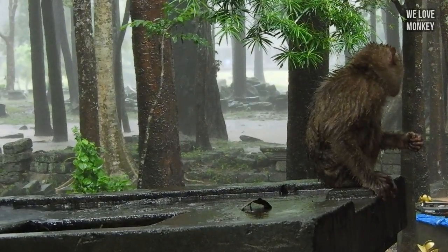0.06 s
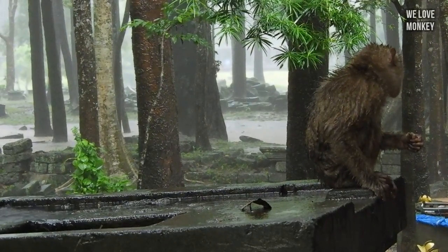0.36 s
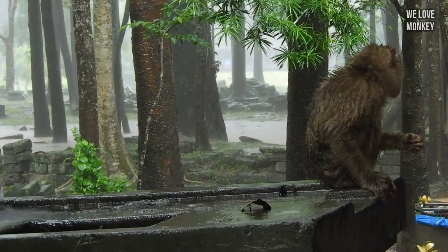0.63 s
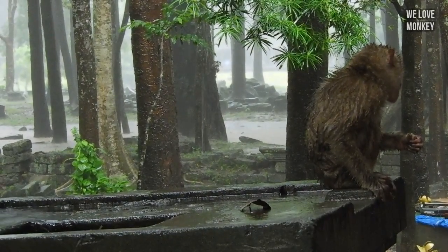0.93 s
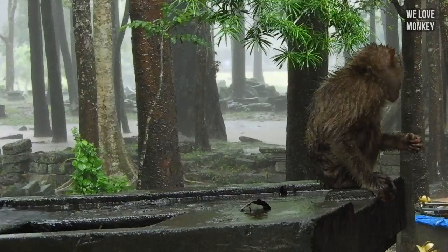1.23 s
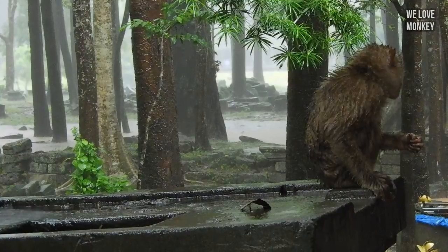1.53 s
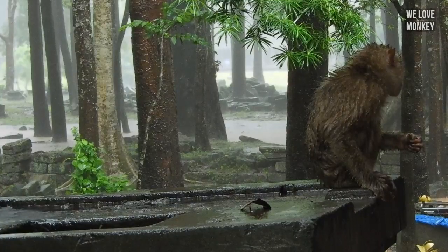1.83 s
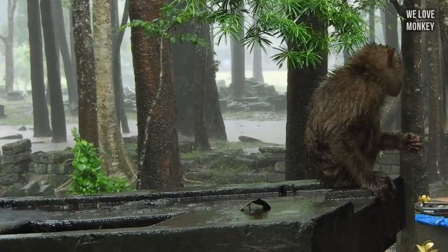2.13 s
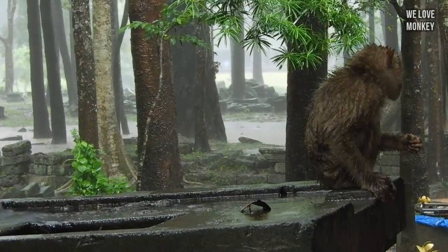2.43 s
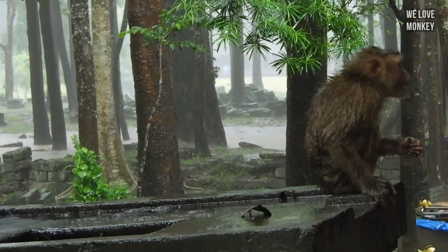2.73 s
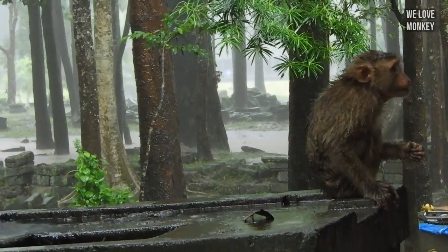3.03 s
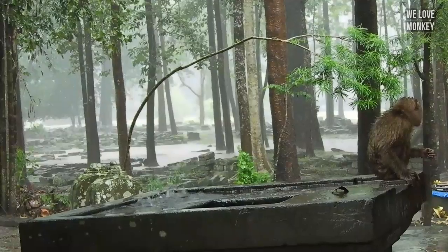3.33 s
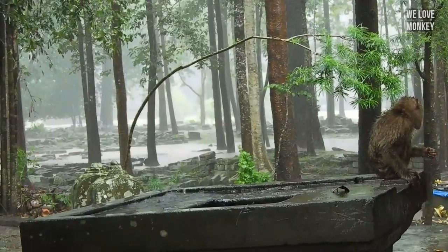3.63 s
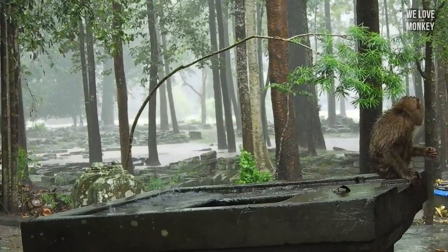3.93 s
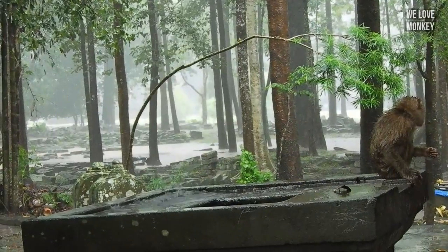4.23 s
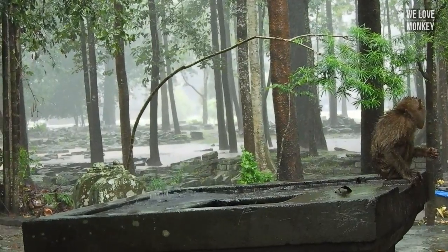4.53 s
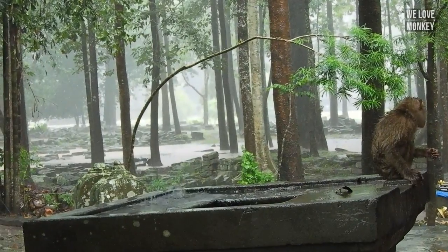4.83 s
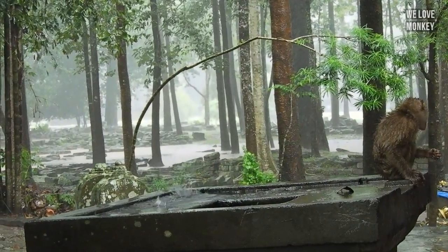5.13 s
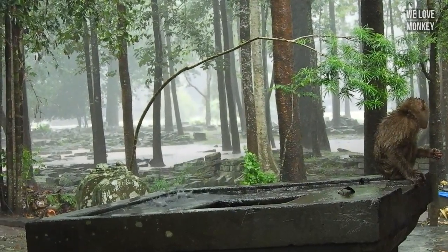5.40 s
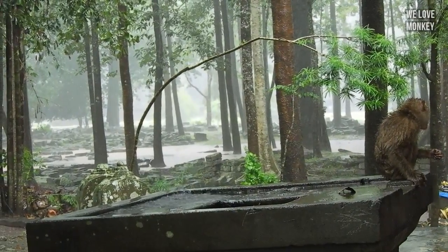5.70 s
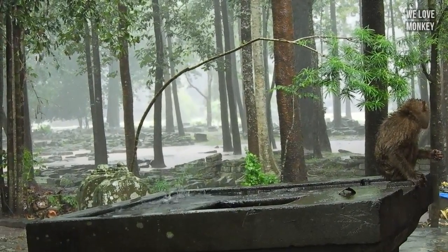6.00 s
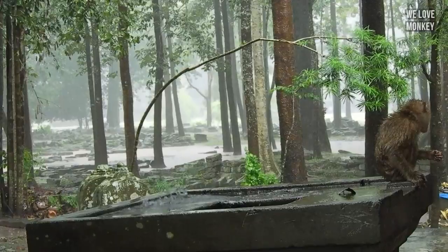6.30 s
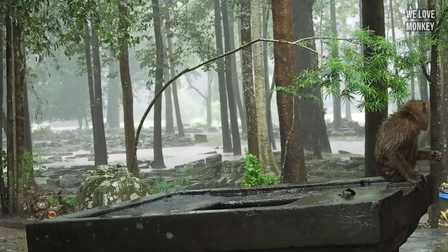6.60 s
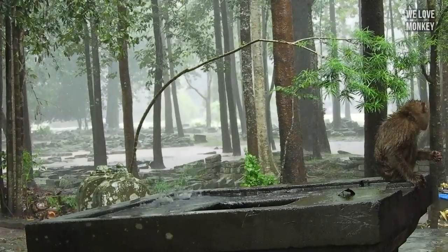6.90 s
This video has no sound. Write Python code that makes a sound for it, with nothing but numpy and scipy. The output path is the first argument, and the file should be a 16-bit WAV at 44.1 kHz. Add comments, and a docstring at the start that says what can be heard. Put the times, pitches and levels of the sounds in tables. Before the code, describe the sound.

Heavy rain falls steadily in a forest, a wide hiss from the canopy with small drops pattering on leaves and plinking in puddles. Close to the microphone, fat drops slap irregularly on wet stone, each with a short echo off the trees. A little before halfway the sound cuts out for half a second, then returns unchanged. A faint hum and a slowly growing distant rumble lie underneath.

```python
"""Heavy, steady rain on a forest: fat drops slap on wet stone close by and echo off the trees.
Behind them small drops patter on leaves, bubbles ring in puddles and the canopy blurs into a wide wash.
Underneath lie a faint hum and a low rumble that slowly grows and surges a few times.
The sharpest drops trip the gain control, which creeps back up; the sound cuts out for half a second."""
import sys
import numpy as np
from scipy import signal
from scipy.fft import rfft, irfft
from scipy.io import wavfile
from scipy.ndimage import uniform_filter1d, minimum_filter1d

SR = 44100
rng = np.random.default_rng(int(sys.argv[2]) if len(sys.argv) > 2 else 0)


def persist_wave(psi):
    """Save psi, clipped to +-1, as 16-bit WAV."""
    counts = np.round(np.clip(psi, -1, 1) * 32767).astype(np.int16)
    wavfile.write(sys.argv[1], SR, np.atleast_2d(counts).T)


N = 315315
TIME = np.arange(N) / SR

# treble response of the microphones: f/Hz, gain/dB
MIC_TREBLE = [(4000, 2), (7500, 0.5), (8900, 5), (9400, 5.5), (10000, 0), (11500, -8), (12500, -12.5),
              (13100, -17), (14500, -16), (16000, -38.5)]


def gain_of(db):
    """Decibels as an amplitude factor."""
    return 10 ** (np.asarray(db) / 20)


def unit_rms(x):
    """Scales to rms 1."""
    return x / np.sqrt(np.mean(x ** 2) + 1e-20)


def curve_at(points, hz):
    """Reads a spectrum table on a log-frequency axis."""
    f, value = np.transpose(points)
    return np.interp(np.log(hz + 1), np.log(f + 1), value)


def fader(points):
    """A gain ride through points of t/s, level/dB."""
    return gain_of(np.interp(TIME, *np.transpose(points)))


def add(mix, start_s, sound):
    """Mixes a stereo sound in at start_s."""
    part = mix[:, max(round(start_s * SR), 0):][:, :sound.shape[1]]
    part += sound[:, :part.shape[1]]


def bell_db(hz, centre_hz, octaves):
    """An EQ bell, 3 dB down at the given distance from its centre."""
    return np.maximum(-3 * (np.log2((hz + 1) / centre_hz) / octaves) ** 2, -80)


def grid(size):
    """Frame times (a column) and bin frequencies for short-time spectra."""
    hop = size // 4
    return np.arange(N // hop + 6)[:, None] * hop / SR, np.fft.rfftfreq(size, 1 / SR)


def shaped_noise(field_db, coherence):
    """Stereo noise of rms 1 that follows a frames x bins level field; coherence 1 is mono."""
    a, b, c, d = rng.standard_normal((4,) + field_db.shape)
    size = 2 * (field_db.shape[1] - 1)
    left = a + 1j * b
    right = coherence * left + np.sqrt(1 - coherence ** 2) * (c + 1j * d)
    spectra = (np.array([left, right]) * gain_of(field_db)).swapaxes(1, 2)
    return unit_rms(signal.istft(spectra, nperseg=size, noverlap=size * 3 // 4)[1][:, :N])


def running_rms(x):
    """Level of both channels over a millisecond and a half."""
    power = uniform_filter1d(np.mean(x ** 2, axis=0), size=66, mode="constant")
    return np.sqrt(abs(power) + 1e-12)


def stereo_tilt_and_comb(x, comb_db=3, comb_hz=3900, tooth_spacing_hz=100.7):
    """The left side is a little brighter; a fine comb filter colours the hiss near 4 kHz."""
    # stereo tilt: f/Hz, left minus right/dB
    imbalance = [(100, -.5), (800, 0.5), (1400, -1), (2400, 1.6), (4000, 0), (7000, 1), (9000, 2),
                 (13000, 2)]
    hz = np.fft.rfftfreq(N, 1 / SR)
    depth_db = comb_db * gain_of(bell_db(hz, comb_hz, octaves=0.12))
    teeth_db = depth_db * (np.cos(2 * np.pi * hz / tooth_spacing_hz) - .5)
    sides_db = np.array([[.5], [-.5]]) * curve_at(imbalance, hz)
    return irfft(rfft(x) * gain_of(teeth_db + sides_db), N)


def hum(centre_hz=56, width_hz=7, level_db=-60):
    """A faint low hum: a band of noise so narrow that it wavers."""
    t, hz = grid(size=8192)
    line_db = -20 * np.log10(1 + ((hz - centre_hz) / width_hz) ** 2)
    return gain_of(level_db) * shaped_noise(np.tile(line_db, (len(t), 1)), coherence=0.9)


def rumble(bed_hz=174, surge_sigma_s=0.083, trim_db=-1.5):
    """A dull far-off rumble that slowly grows, with a few surges, each at its own pitch."""
    # ride of the rumble bed: t/s, level/dB before trim
    bed_levels = [(0, -45), (.8, -51.5), (1.4, -48.5), (2.1, -49), (3.3, -44), (4.4, -47), (6.1, -43),
                  (7.15, -43.5)]
    # crests of the surges: t/s, level/dB before trim, f/Hz
    surges = [(4.71, -41.5, 135), (4.97, -39, 243), (5.22, -44, 143), (6.72, -43.5, 220),
              (6.93, -41.5, 148)]
    t, hz = grid(size=2048)

    def roar(centre_hz):
        """Low noise around one pitch; distance cuts the upper side steeply."""
        band_db = bell_db(hz, centre_hz, octaves=np.where(hz < centre_hz, 1.0, 0.5))
        return shaped_noise(np.tile(band_db, (len(t), 1)), coherence=0.98)

    out = fader(bed_levels) * roar(bed_hz)
    for crest_s, level_db, centre_hz in surges:
        swell = np.exp(-.5 * ((TIME - crest_s) / surge_sigma_s) ** 2)
        out += gain_of(level_db) * swell * roar(centre_hz)
    return gain_of(trim_db) * out


def canopy_wash(level_db=-33.5, patchy_db=2.0, flicker_db=0.75):
    """Countless far drops merge into a hiss with small drifting patches."""
    # tone of the far rain: f/Hz, relative level/dB
    tone = [(15, -21.5), (45, -1), (130, 2.5), (300, 3.5), (520, 0.5), (820, 3.5), (1300, 1), (2000, -0.5),
            (2800, 0.44), (4000, -2), (6000, 0), (8000, 3.5), (16000, -12.5)]
    # its stereo image: f/Hz, left-right coherence
    image = [(100, 0.98), (500, 0.81), (820, 0.92), (1500, 0.67), (2800, 0.69), (5000, 0.75), (6500, 0.31),
             (8000, -0.16), (14000, 0.077)]
    t, hz = grid(size=512)
    patches = uniform_filter1d(rng.standard_normal((len(t), len(hz))), size=12, axis=0)
    patches = unit_rms(uniform_filter1d(patches, size=5, axis=1))
    flicker = unit_rms(uniform_filter1d(rng.standard_normal(len(t)), size=12))[:, None]
    nearness = hz / (hz + 250)  # the lows come from farther off and are smoother
    texture_db = nearness * (patchy_db * patches + flicker_db * flicker)
    field_db = curve_at(tone, hz) + curve_at(MIC_TREBLE, hz) + texture_db
    return gain_of(level_db) * shaped_noise(field_db, curve_at(image, hz))


def bubbles(level_db=-43, spread_db=10, low_hz=550, high_hz=3600, ring_s=0.015, rise=0.042, count=150):
    """Drops in puddles trap bubbles, which ring briefly and rise a little in pitch."""
    out, t = np.zeros((2, N)), np.arange(SR // 12) / SR
    for when, pitch, softness, side in rng.random((count, 4)):
        hz = low_hz * (high_hz / low_hz) ** pitch
        ring = np.sin(2 * np.pi * hz * t * (1 + rise * t / t[-1])) * np.exp(-t / ring_s)
        sides = np.sqrt([[.5 + side], [1.5 - side]])
        add(out, when * N / SR, gain_of(level_db - spread_db * softness) * sides * ring)
    return out


def splash(centre_hz, slap_s=0.00022, grit=1.0, spray=0.16, spray_s=0.0011, octaves=0.46, crack_db=2):
    """One drop, peak 1: a slap a few cycles long, then spray that scatters to each side."""
    size = 512
    t, hz = np.arange(size) / SR, np.fft.rfftfreq(size, 1 / SR)
    slap = np.cos(2 * np.pi * (centre_hz * t + rng.random())) + grit * rng.standard_normal(size)
    slap = slap * np.sqrt(t / slap_s) * np.exp(1 - t / slap_s)
    scatter = 2 * spray * np.exp(-t / spray_s) * rng.standard_normal((2, size))
    # the drop's direction sets the lag between the microphones
    lag_s = 0.000498 + np.array([[-1], [1]]) * rng.normal(0, .000045)
    shelf_db = crack_db * np.clip((hz - 9500) / 3500, 0, 1)  # a hard surface adds top treble
    colour = gain_of(bell_db(hz, centre_hz, octaves) + shelf_db + curve_at(MIC_TREBLE, hz))
    drop = irfft(rfft(slap + scatter) * colour * np.exp(-2j * np.pi * hz * lag_s))
    return drop / abs(drop).max()


def patter(per_s, level_db, spread_db, low_hz, high_hz, largest, surfaces=48):
    """Drops of all sizes at random moments; each kind of leaf or puddle has its own pitch and side."""
    lands = rng.random(N) < per_s / SR
    bulk = np.minimum(rng.exponential(1, N), largest)
    hits = gain_of(spread_db * bulk) * lands
    surface = rng.integers(0, surfaces, N)
    out = np.zeros((2, N))
    for k, hz in enumerate(np.linspace(low_hz, high_hz, surfaces)):
        sides = gain_of(np.array([[1], [-1]]) * rng.normal(0, 4.5))
        out += sides * signal.oaconvolve((hits * (surface == k))[None], splash(hz), axes=1)[:, :N]
    return gain_of(level_db) * unit_rms(out)


def forest_echo(x):
    """A short diffuse echo from trunks and ground, different on each side."""
    # decay among the trees: f/Hz, T60/s
    decay_times = [(500, 0.29), (3000, 0.31), (9000, 0.13)]
    hz, t, spectra = signal.stft(rng.standard_normal((2, 8192)), SR, nperseg=256)
    decay = gain_of(-60 * t / curve_at(decay_times, hz)[:, None])
    tail = signal.istft(spectra * decay, SR, nperseg=256)[1]
    return signal.oaconvolve(x, tail / np.linalg.norm(tail[0]), axes=1)[:, :N]


def branch_drips(per_s, level_db, spread_db, low_hz, high_hz, pan_db=1.0, pan_spread_db=7, count=700):
    """Lesser fat drops fall from the branches at random: a cue list for close_drops."""
    when, softness, pitch, side, chance = rng.random((count, 5)).T
    cues = np.transpose([when * N / SR,
                         level_db - spread_db * softness,
                         low_hz + (high_hz - low_hz) * pitch,
                         pan_db + pan_spread_db * (2 * side - 1)])
    return cues[chance < per_s * N / SR / count]


def close_drops(cues, droplet_db=-4, scatter_s=0.019, droplets=4):
    """Fat drops plop on water and leaves or splat on stone; each throws droplets that land just after."""
    out = np.zeros((2, N))
    for start_s, level_db, hz, pan_db in cues:
        drop = splash(hz, slap_s=0.00065, grit=1.7, spray=.42, octaves=0.54, crack_db=1.0)
        drop = drop * gain_of(np.array([[pan_db], [-pan_db]]) / 2)
        add(out, start_s, gain_of(level_db) * drop / running_rms(drop).max())
        for wait, pitch, softness in rng.random((droplets, 3)):
            droplet = gain_of(level_db + droplet_db - 6 * softness) * splash(hz * (.8 + .5 * pitch))
            add(out, start_s + 0.0027 + scatter_s * wait, droplet)
    return out


def scene():
    """The rain bed follows the downpour; fat drops and their echo sit on top, rumble and hum below."""
    # how hard it rains: t/s, gain/dB
    downpour = [(0, -0.5), (.8, -1.1), (1.7, -1), (2.5, 1), (4, -0.86), (5.2, 0.8), (5.8, -0.6),
                (7.15, -0.5)]
    # the loudest close drops: t/s, level/dB, f/Hz, left minus right/dB
    hero_drops = [(0.036, -23.5, 3440, 0), (0.046, -21.5, 7000, -2), (0.321, -17, 7460, 1),
                  (0.379, -20, 6500, 5), (0.962, -21, 3530, 0), (0.972, -22.5, 6500, 2),
                  (1.602, -22.5, 7840, 4), (1.789, -22, 2890, 9.5), (2.627, -20, 6830, 0),
                  (3.196, -22.5, 8000, 4.5), (3.266, -27, 3350, 6), (3.276, -19.5, 6030, -2),
                  (3.522, -24, 6560, 2), (3.721, -26, 3000, 5), (3.73, -22, 6060, 0),
                  (4.724, -25.5, 6600, 3), (5.067, -27, 2870, -2), (5.251, -25, 3150, 14),
                  (5.262, -19, 6800, -2), (5.359, -25, 7840, 0), (5.434, -22, 6900, 2),
                  (5.477, -28, 3350, -2), (5.621, -17.5, 6350, 0), (6.243, -22, 6200, 0),
                  (6.382, -24.5, 8400, 3), (6.723, -20.5, 7960, 3), (6.968, -24, 7100, 1),
                  (7.075, -23, 7960, -0.5)]
    leaves = patter(per_s=1100, level_db=-38.5, spread_db=2.5, low_hz=3980, high_hz=9340, largest=3.8)
    puddles = patter(per_s=200, level_db=-49.5, spread_db=2.0, low_hz=2180, high_hz=3850, largest=3.5)
    rain_bed = (canopy_wash() + leaves + puddles + bubbles()) * fader(downpour)
    splats = branch_drips(per_s=6.5, level_db=-25.5, spread_db=1.5, low_hz=5800, high_hz=8600)
    plops = branch_drips(per_s=3.2, level_db=-29, spread_db=5.5, low_hz=2500, high_hz=3400)
    drops = close_drops([*hero_drops, *splats, *plops])
    return rain_bed + drops + gain_of(-10) * forest_echo(drops) + rumble() + hum()


def record(dry, ceiling_db=-23.2, recovery_s=0.64, mute_from_s=2.6455, mute_to_s=3.178, cutoff_hz=15850):
    """Drops over the ceiling duck the gain at once and it recovers slowly; then a dropout and high cut."""
    x = stereo_tilt_and_comb(dry)
    over_db = np.maximum(20 * np.log10(running_rms(x)) - ceiling_db, 0)
    release = np.exp(-TIME / recovery_s)  # lets go quickly at first, then ever more slowly
    duck_db = np.maximum.accumulate(over_db / release) * release
    gain = minimum_filter1d(gain_of(-duck_db), size=70)  # looks ahead by almost a millisecond
    live = (TIME < mute_from_s) | (TIME > mute_to_s)
    x = x * uniform_filter1d(gain * live, size=40)
    high_cut = signal.firwin(511, cutoff_hz, window=("kaiser", 9), fs=SR)
    return signal.oaconvolve(x, high_cut[None], "same")


dry = scene()
out = record(dry)
persist_wave(out)
```